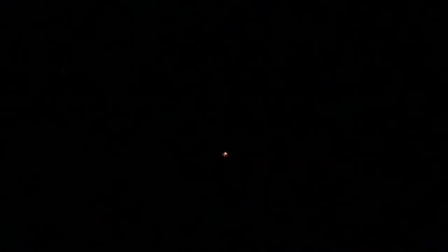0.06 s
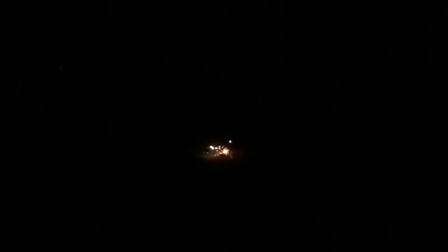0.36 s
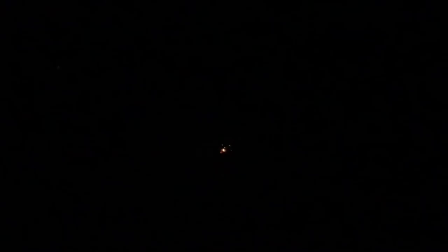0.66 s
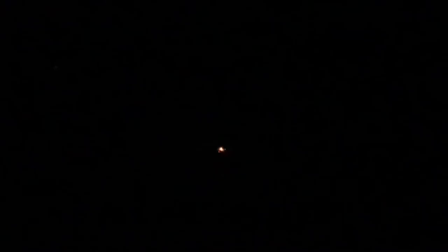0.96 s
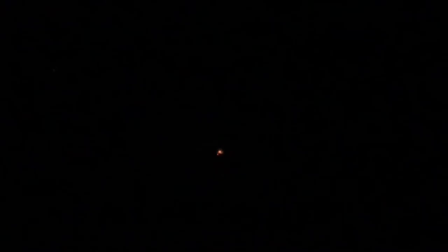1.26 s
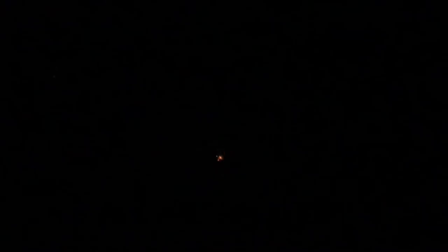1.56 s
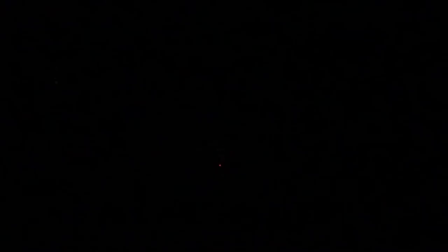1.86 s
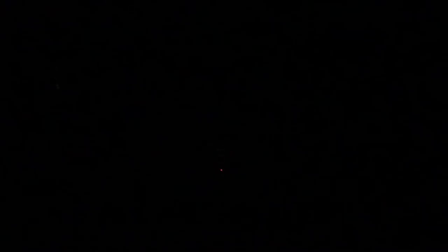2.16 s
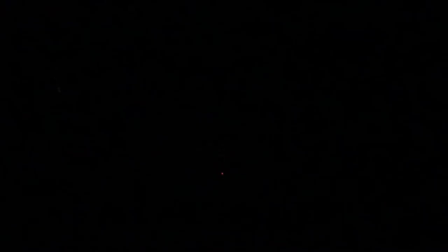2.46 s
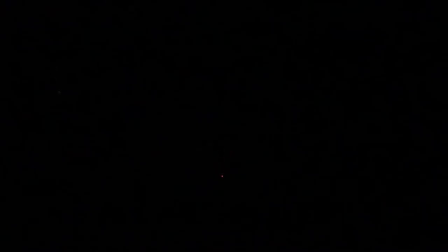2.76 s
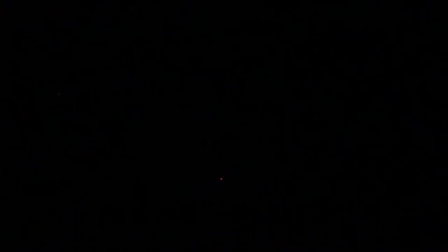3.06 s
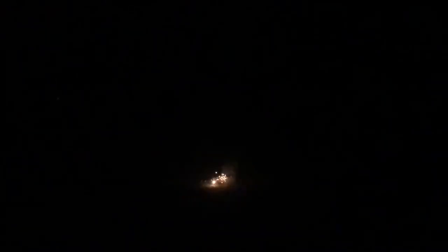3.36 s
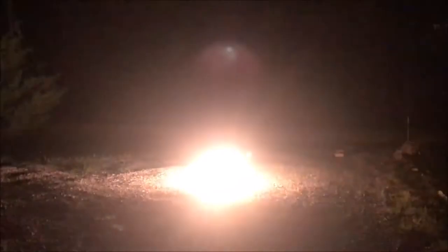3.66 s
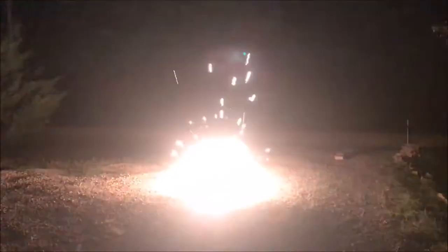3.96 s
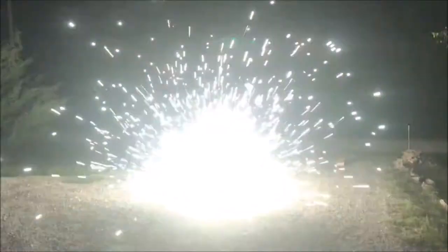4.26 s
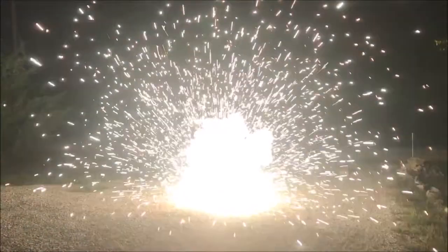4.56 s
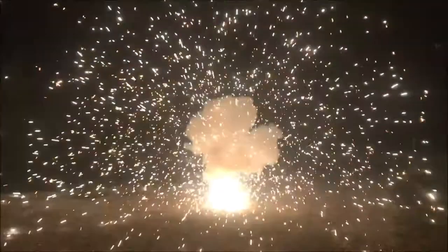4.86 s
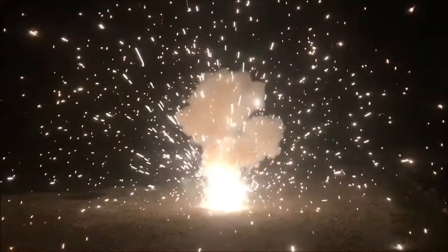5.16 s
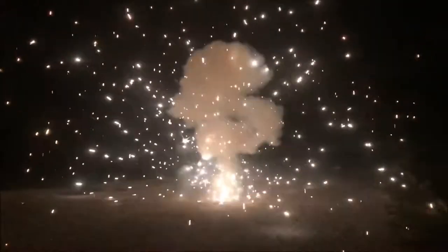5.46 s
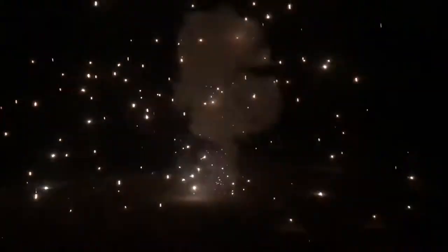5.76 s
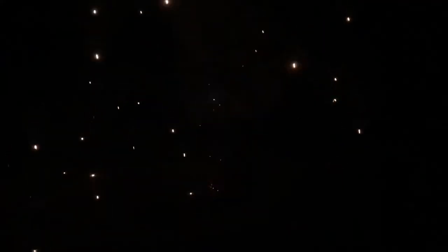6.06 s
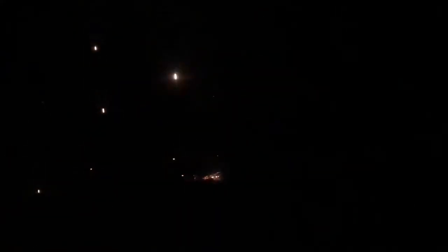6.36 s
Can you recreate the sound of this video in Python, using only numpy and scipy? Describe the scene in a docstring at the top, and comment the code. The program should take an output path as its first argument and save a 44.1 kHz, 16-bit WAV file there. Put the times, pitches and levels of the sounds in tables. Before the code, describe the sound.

A ground firework on gravel spits briefly as its fuse burns, against a quiet night chorus of crickets. The charge catches with a hiss and a soft roar, then explodes in loud, rapid crackling pops with bassy thumps. The pops thin out and stop, echoing off distant trees. The microphone distorts on the bangs, and the insects sound fainter afterwards.

```python
"""Ground firework among crickets

A crackling firework on a gravel drive at night, with crickets all round. The fuse spits and smoulders;
the charge catches and flares, then its stars explode in a dense volley of cracks. The blasts overload
the microphone, whose bass rings after them, and gain control ducks the crickets."""
import sys
import numpy as np
from scipy import signal
from scipy.fft import rfft, irfft, next_fast_len
from scipy.io import wavfile
from scipy.ndimage import uniform_filter1d, minimum_filter1d

SR = 44100
rng = np.random.default_rng(int(sys.argv[2]) if len(sys.argv) > 2 else 0)


def transcribe(u):
    """Save the signal u as a 16-bit wav file named by the first command-line argument.

    u: samples, shape (n,) or (channels, n), limited to [-1, 1]; the rate is SR.
    q: integer samples, one column per channel.
    """
    v = np.clip(np.atleast_2d(u).T, -1, 1)
    q = np.round(v * 32767).astype(np.int16)
    wavfile.write(sys.argv[1], SR, q)


N = 282681
TIME = np.arange(N) / SR


def gain_of(db):
    """Decibels to gain."""
    return 10 ** (np.asarray(db) / 20)


def unit_rms(x):
    """Scale to rms 1."""
    return x / np.sqrt(np.mean(x ** 2) + 1e-20)


def at_hz(points, hz):
    """Interpolate a table on a log-frequency axis."""
    points_hz, value = np.transpose(points)
    return np.interp(np.log(hz + 1), np.log(points_hz + 1), value)


def add(mix, start_s, sound):
    """Mix a sound in at start_s."""
    part = mix[max(round(start_s * SR), 0):][:len(sound)]
    part += sound[:len(part)]


def noise(colour):
    """Noise of rms 1 with the given spectrum."""
    shape = gain_of(at_hz(colour, np.fft.rfftfreq(N, 1 / SR)))
    return unit_rms(irfft(rfft(rng.standard_normal(N)) * shape, N))


def envelope(rows, column=1):
    """Smoothed gain curve from one dB column, silent outside its span."""
    rows = np.array(rows)
    return uniform_filter1d(gain_of(np.interp(TIME, rows[:, 0], rows[:, column], -120, -120)), size=300)


def swell(peak_s, rise_db_per_s, fall_db_per_s):
    """Gain that climbs to 1 at peak_s and dies away."""
    return gain_of(np.minimum(rise_db_per_s * (TIME - peak_s), fall_db_per_s * (peak_s - TIME)))


def wander(per_s):
    """Smooth random curve of rms 1."""
    return unit_rms(signal.resample(rng.standard_normal(int(per_s * N / SR) + 2), N))


def minimum_phase(db):
    """Spectrum of the quickest-starting filter with this gain."""
    log_gain = np.log(gain_of(np.r_[db, db[-2:0:-1]]))
    return np.exp(np.conj(signal.hilbert(log_gain)))[:len(db)]


def night_air(level_db=-55.5):
    """Distant rumble and still air."""
    # air spectrum: (frequency [Hz], level [dB])
    colour = [(20, -22), (45, -14.5), (68, 3), (100, -15), (200, -15), (400, -25.5), (900, -29),
              (1700, -35), (4500, -31), (9000, -37), (12500, -31), (15500, -30.5)]
    return gain_of(level_db) * noise(colour)


def wings(t, pitch_hz, sag_hz, per_s):
    """Each wing stroke sings one tone pulse that sags in pitch."""
    stroke = (t * per_s) % 1
    hz = pitch_hz + sag_hz * (.5 - stroke)
    return np.sin(np.pi * stroke) ** 2 * np.sin(2 * np.pi * np.cumsum(hz) / SR)


def far_insects(sag_hz=110, drift_hz=18, drift_s=0.0037, blur=0.62, count=7):
    """Choruses, each voice at its own pitch and pace, blurred by distance."""
    # choruses: (pitch [Hz], pitch spread [Hz], level [dB], pulse rate [1/s])
    choruses = [(2404, 70, -51, 43), (2876, 100, -65.5, 70), (3233, 110, -63.5, 40), (5800, 280, -66, 60),
                (7440, 360, -65.5, 82)]
    out, hz = np.zeros(N), np.fft.rfftfreq(N, 1 / SR)
    shared_drift = wander(12)
    for centre_hz, spread_hz, db, per_s in choruses:
        voices = np.zeros(N)
        for place in np.linspace(-1, 1, count):
            drift = np.roll(shared_drift, rng.integers(N))
            pitch_hz = centre_hz + spread_hz * place + drift_hz * drift
            clock_s = TIME + rng.random() + drift_s * drift
            voices += wings(clock_s, pitch_hz, sag_hz, per_s * rng.uniform(.8, 1.2))
        band = 1 / (1 + ((hz - centre_hz) / (1.89 * spread_hz)) ** 4)
        haze = irfft(rfft(rng.standard_normal(N)) * band, N)
        out += gain_of(db) * unit_rms((1 - blur) * unit_rms(voices) + blur * unit_rms(haze))
    return out


def song(length_s, pitch_hz, sag_hz, per_s, rasp, rise_hz=70, grit_per_s=900):
    """One run of rasping wing strokes that creeps up in pitch."""
    t = np.arange(0, length_s, 1 / SR)
    grit = unit_rms(signal.resample(rng.standard_normal(int(grit_per_s * length_s) + 2), len(t)))
    hz = pitch_hz + rise_hz * (t / t[-1] - .5) + sag_hz * rasp * grit
    return unit_rms(wings(t, hz, sag_hz, per_s) * signal.windows.tukey(len(t), .5))


def near_crickets(leaves_db=-8, leaves_t60_s=0.24):
    """Single insects trill and chirp, smeared by foliage."""
    # trills: (start [s], end [s], pitch [Hz], pulse rate [1/s], level [dB])
    trills = [(0, .14, 5300, 50, -69), (0.536, .82, 5350, 36, -64.5), (1.02, 1.26, 5060, 50, -72),
              (1.243, 1.614, 5340, 46, -68), (1.7, 2.02, 5200, 49, -72), (2.636, 3.075, 5350, 46, -64),
              (2.92, 3.25, 5100, 45, -73)]
    # steady chirpers: (start [s], end [s], period [s], chirp length [s], pitch [Hz], sag per pulse [Hz],
    # pulse rate [1/s], rasp [0-1], level [dB], growth [dB/s])
    chirpers = [ (2.105, 3.35, .282, .175, 3800, 480, 42, 0.26, -67.5, 5.5),
                (.5, 3.0, .585, .09, 4370, 450, 24, .05, -72, 1.5), ]
    out = np.zeros(N)
    for start_s, end_s, pitch_hz, per_s, db in trills:
        add(out, start_s, gain_of(db) * song(end_s - start_s, pitch_hz, sag_hz=110, per_s=per_s, rasp=.8))
    for start_s, end_s, period_s, length_s, pitch_hz, sag_hz, per_s, rasp, db, db_per_s in chirpers:
        for at_s in np.arange(start_s, end_s, period_s):
            chirp = song(length_s, pitch_hz, sag_hz, per_s, rasp)
            add(out, at_s, gain_of(db + db_per_s * (at_s - start_s)) * chirp)
    t = np.arange(SR // 4) / SR
    leaves = rng.standard_normal(len(t)) * gain_of(-60 * t / leaves_t60_s)
    smear = signal.fftconvolve(out, leaves / np.linalg.norm(leaves))[:N]
    return (out + gain_of(leaves_db) * smear) / np.hypot(1, gain_of(leaves_db))


def surroundings(x, near_db=-17, near_t60_s=0.54, far_db=-21, echo_width_s=0.0075):
    """Near ground scatters briefly, a few things echo, far trees give a long thin tail."""
    # scatter off gravel and trees: (frequency [Hz], gain [dB])
    colour = [(60, -38.5), (300, -15), (800, -9.5), (2000, -1), (4500, 3.5), (8000, 2), (15000, -0.5)]
    # decay of the far tail: (frequency [Hz], T60 [s])
    far_t60 = [(200, .7), (1000, 3.04), (4000, 1.14), (8000, 1.14), (15000, 0.37)]
    # distinct echoes: (delay [s], level [dB])
    echoes = [(0.037, -20), (.047, -40)]
    t = np.arange(2 * SR) / SR
    hz, frame_s, spectra = signal.stft(rng.standard_normal(len(t)), SR, nperseg=256)
    spectra *= gain_of(-60 * frame_s / at_hz(far_t60, hz)[:, None])
    far = signal.istft(spectra, SR, nperseg=256)[1][:len(t)]
    near = rng.standard_normal(len(t)) * gain_of(-60 * t / near_t60_s)
    parts = [(far_db, far), (near_db, near)]
    for delay_s, db in echoes:
        decay = (t > delay_s) * np.exp(-abs(t - delay_s) / echo_width_s)
        parts.append((db, rng.standard_normal(len(t)) * decay))
    tail = sum(gain_of(db) * part / np.linalg.norm(part) for db, part in parts)
    tail = irfft(rfft(tail) * minimum_phase(at_hz(colour, np.fft.rfftfreq(len(t), 1 / SR))))
    return signal.fftconvolve(x, tail)[:N]


def fuse(spit_s=.44, spit_db=-40, catch_s=3.3, catch_rise_s=.06, choke_s=3.476, catch_db=-39.5):
    """Sputtering gas: one spit, a smoulder, then a whistling swell as the flame enters the casing."""
    # gas spectrum: (frequency [Hz], level [dB])
    gas_colour = [(150, -15.5), (500, -3.5), (1000, 1), (1600, -2), (2800, -5), (5000, -6), (7600, -6),
                  (9000, -2.5), (10500, -3), (15500, -12)]
    # whistle spectrum: (frequency [Hz], level [dB])
    whistle_colour = [(7400, -45), (8200, -3), (8650, 0), (9300, -4.5), (10000, -39)]
    # smouldering hiss: (time [s], level [dB])
    smoulder = [(0, -71), (1.0, -62), (1.35, -62), (1.7, -66), (2.1, -88)]
    burst = swell(spit_s, rise_db_per_s=224, fall_db_per_s=290)
    after_hiss = gain_of(-11) * swell(spit_s, rise_db_per_s=224, fall_db_per_s=100)
    spit = gain_of(spit_db) * np.maximum(burst, after_hiss)
    onset = np.clip((TIME - catch_s) / catch_rise_s, 0, 1)
    catch = gain_of(catch_db) * onset * swell(choke_s, rise_db_per_s=41, fall_db_per_s=800)
    whistle = gain_of(-6) * catch * noise(whistle_colour)
    gas = (spit + catch + envelope(smoulder)) * noise(gas_colour)
    sputter_db = 1.5 * wander(300)
    return (gas + whistle) * gain_of(sputter_db)


def flare(jet_trim_db=1, flutter_db=2):
    """The charge burns with a hissing jet and a fluttering flame."""
    # flare-up: (time [s], jet level [dB], roar level [dB])
    levels = [(3.5, -62.5, -58.5), (3.612, -61.5, -50.5), (3.666, -48, -38.5), (3.81, -48.5, -45.5),
              (3.87, -43.5, -45), (3.97, -42.5, -44.5), (4.035, -44, -45)]
    # jet spectrum: (frequency [Hz], level [dB])
    jet_colour = [(800, -11), (2000, -10.5), (4000, 5), (7000, 1.5), (9000, 4.5), (13000, 4), (16000, 0.5)]
    # flame spectrum: (frequency [Hz], level [dB])
    roar_colour = [(30, -18.5), (70, -0.5), (130, 0.5), (300, -10), (700, -12), (1400, -17.5), (3000, -30),
                   (8000, -50)]
    jet = gain_of(jet_trim_db) * envelope(levels) * noise(jet_colour)
    roar = envelope(levels, column=2) * noise(roar_colour) * gain_of(flutter_db * wander(60))
    return jet + roar


def casing_tear(peak_s=4.04, peak_db=-18):
    """The casing tears open just before the first bang."""
    # tear spectrum: (frequency [Hz], level [dB])
    colour = [(60, -19), (200, -3.5), (420, -2), (700, -13.5), (2000, -28), (8000, -45)]
    return gain_of(peak_db) * swell(peak_s, rise_db_per_s=1000, fall_db_per_s=1501) * noise(colour)


def crack(tilt_db_per_oct, lag_turns=.6, spray_s=0.0025, spray=0.074, bounce=0.43, size=2048):
    """A shock, its ground bounce and a brief spray from the gravel; energy 1."""
    # crack spectrum: (frequency [Hz], level [dB])
    colour = [(100, -11), (350, -1.5), (900, 2.5), (2000, -3), (4000, -1), (5500, -5.5), (7400, -8.5),
              (8700, -6.5), (13000, -10), (16000, -10.5)]
    t, hz = np.arange(size) / SR, np.fft.rfftfreq(size, 1 / SR)
    blast = spray * rng.standard_normal(size) * np.exp(-t / spray_s)
    blast[0] += 1
    blast[round(rng.uniform(.0002, .0006) * SR)] += bounce
    colour_db = at_hz(colour, hz) + tilt_db_per_oct * np.log2(np.clip(hz, 750, 9000) / 2000)
    travel_s = rng.uniform(.00005, .00015)
    lag = lag_turns * np.log(hz + 60) + hz * travel_s  # the microphone passes treble first, bass later
    wave = irfft(rfft(blast) * minimum_phase(colour_db) * np.exp(-2j * np.pi * lag))
    wave *= signal.windows.tukey(2 * size, .5)[size:]
    return wave / np.linalg.norm(wave)


def thump(rest_hz=21, sweep_turns=0.52, rise_s=0.0017, ring_s=0.011, decay_power=0.94):
    """The microphone's bass cut spreads a pressure jump into a ring that falls quickly in pitch."""
    t = np.arange(SR // 10) / SR
    turns = rest_hz * t + sweep_turns * np.log1p(t / 0.00024) + rng.uniform(0.082, 0.36)
    return -np.cos(2 * np.pi * turns) * (1 - np.exp(-t / rise_s)) * np.exp(-(t / ring_s) ** decay_power)


def volley(fade_db_per_s=21, jitter=.8, tilt_db_per_oct=-0.47, bass_db=-27, small_per_s=130, small_db=7):
    """Stars burst unevenly in waves that weaken as they fly apart, with small ones in between."""
    # waves of stars: (start [s], end [s], pop rate [1/s], initial crack level [dB])
    waves = [(4.374, 4.402, 160, 23.5), (4.439, 4.493, 178, 21.5), (4.557, 4.615, 145, 21.5),
             (4.619, 4.687, 190, 21.5), (4.757, 4.845, 135, 20.5)]
    out = np.zeros(N)
    for start_s, end_s, per_s, db in waves:
        for slot_s in np.arange(start_s, end_s, 1 / per_s):
            at_s = slot_s + jitter * rng.random() / per_s
            strength, brightness, weight = np.clip(rng.standard_normal(3), -2, 2)
            gain = gain_of(db - fade_db_per_s * (at_s - start_s) + 1.9 * strength)
            add(out, at_s, gain * crack(tilt_db_per_oct + brightness))
            add(out, at_s, gain * gain_of(bass_db + 4.5 * weight) * thump())
        for at_s in rng.uniform(start_s, end_s, round(small_per_s * (end_s - start_s))):
            strength, brightness = np.clip(rng.standard_normal(2), -2, 2)
            add(out, at_s, gain_of(small_db + 4 * strength) * crack(tilt_db_per_oct + brightness))
    return out


def loud_pops():
    """The pops that stand out, fuse ticks and bursting stars alike, each a crack and a thump."""
    # pops: (time [s], crack level [dB], tilt [dB/octave], thump level [dB])
    pops = [(0.1253, -5, 2.3, -56), (0.194, -20, -0.5, -57), (0.4492, -18, -4, -65),
            (3.4818, -3, -9.5, -62), (4.041, 25, -4, 21.5), (4.0564, 21, 1, 4), (4.0778, 10, -1, -25),
            (4.1046, 22.5, 0, -12), (4.1175, 22, 3, 3.5), (4.1527, 23, -2.5, 14.5), (4.1956, 28, 2.5, 12),
            (4.21, 23.5, -1, -9), (4.225, 28, -5, 16), (4.2404, 23.5, 1, -1.5), (4.2599, 23, -1, -46),
            (4.3111, 26.5, 1, -33), (4.3152, 32.5, 0.5, -1.5), (4.3373, 29, 4, 13), (4.3453, 24, -2.5, -2),
            (4.3618, 24, -0.5, -6), (4.3656, 24, 2.5, 13.5), (4.3682, 25.5, -4.5, 7.5), (4.386, 22, 0.5, 8),
            (4.4045, 23.5, 1.5, -15), (4.4159, 29, -1.5, 9.5), (4.421, 24.5, -0.5, 13.5),
            (4.4486, 23, 1, -1), (4.46, 23.5, -2, -15), (4.4766, 28, -1.5, 9.5), (4.5184, 23, -1, 1),
            (4.5211, 24.5, -.5, 7.5), (4.531, 27, 1, -9), (4.5349, 24, -1.5, 11), (4.539, 28.5, -2, 6),
            (4.548, 19, -3, .5), (4.5693, 18, -2, 11), (4.584, 22, 0, -9), (4.5895, 25, -1, 1),
            (4.5981, 24, 2, 3), (4.6251, 23.5, -2, 13.5), (4.6313, 24, -2, -12), (4.6411, 19.5, 1.5, -8),
            (4.654, 23.5, -1.5, -14.5), (4.6975, 25, -1.5, 5), (4.7046, 23, -2, 4), (4.7164, 25, -1, 8.5),
            (4.742, 26.5, -2.5, 9.5), (4.7511, 22, 0.5, -9), (4.7994, 19, -7, 12.5), (4.8023, 24, -7, 12.5),
            (4.8061, 24.5, -7, 11), (4.8158, 18, 6, 9), (4.8345, 25.5, -1.5, 7), (4.8617, 21, 3, -5.5),
            (4.876, 22.5, 0, -13.5), (4.905, 10.5, 0.5, -32.5), (4.9271, 23, 3, -11), (5.0217, 18, -1, -35),
            (5.0504, 20, -2, -20), (5.064, 23.5, 2, -3), (5.069, 24.5, -1.5, 14.5), (5.0926, 27, -7, 2),
            (5.115, 25.5, 0, -2), (5.1929, 21, 0, -47), (5.195, 24.5, -0.5, 6.5), (5.2513, 20, 0.5, 2.5),
            (5.314, 28.5, -5.5, 16), (5.3285, 22, 2, -17), (5.3569, 19.5, 2.5, -26), (5.369, 23.5, 0, -6),
            (5.473, 25, 2, -30), (6.2724, -23, 15, -55), (6.3772, -5, 3, -54)]
    out = np.zeros(N)
    for at_s, crack_db, tilt_db_per_oct, thump_db in pops:
        add(out, at_s, gain_of(crack_db) * crack(tilt_db_per_oct))
        add(out, at_s, gain_of(thump_db) * thump())
    return out


def scene():
    """The firework and its echoes over the night."""
    night = far_insects() + near_crickets() + night_air()
    firework = fuse() + flare() + casing_tear() + loud_pops() + volley()
    return (firework + surroundings(firework) + night)[None]


def record(dry, notch_hz=10400, notch_width_hz=550, notch_db=-9, overload=6.15, recover_db_per_s=17):
    """The microphone port has a notch and overloads; gain control drops at once and recovers slowly."""
    size = next_fast_len(N // 2 + 1) * 2
    hz = np.fft.rfftfreq(size, 1 / SR)
    port = minimum_phase(notch_db / (1 + ((hz - notch_hz) / notch_width_hz) ** 2))
    x = irfft(rfft(dry[0], size) * port)[:N]
    x = x / (1 + (x / overload) ** 4) ** (1 / 4)  # soft clip
    over_db = 20 * np.log10(abs(x) + 1e-9)
    recovery_db = TIME * recover_db_per_s
    duck_db = np.maximum(np.maximum.accumulate(over_db + recovery_db) - recovery_db, 0)
    x = x * gain_of(uniform_filter1d(minimum_filter1d(-duck_db, size=64), size=64))
    lowpass = signal.firwin(401, cutoff=15850, window=("kaiser", 8), fs=SR)
    return signal.oaconvolve(x, lowpass, "same")[None]


dry = scene()
out = record(dry)
transcribe(out)
```